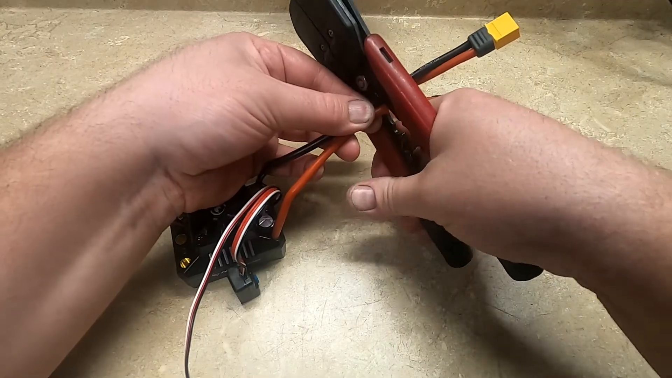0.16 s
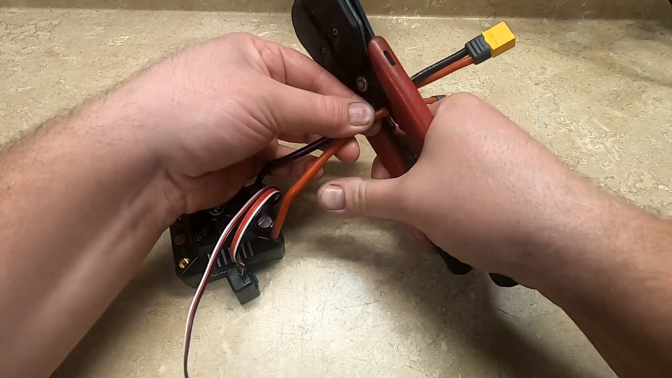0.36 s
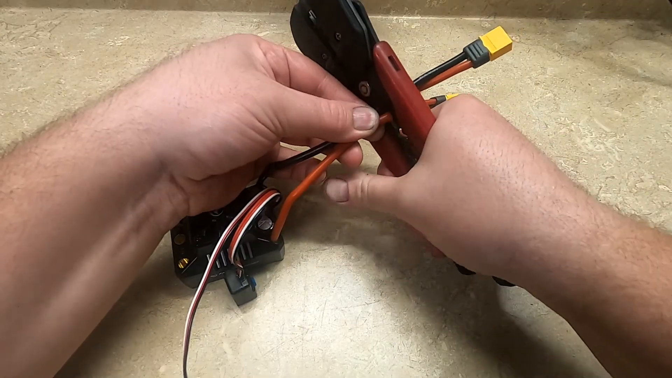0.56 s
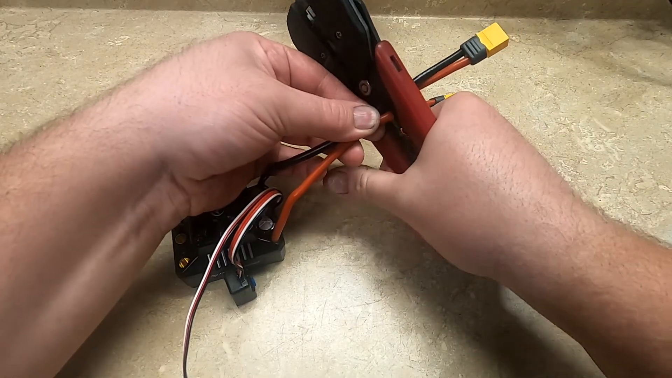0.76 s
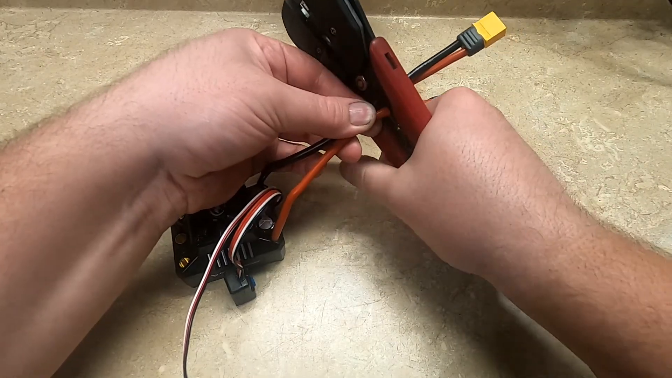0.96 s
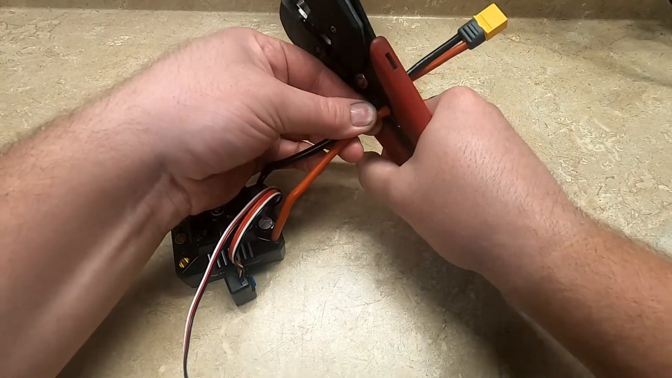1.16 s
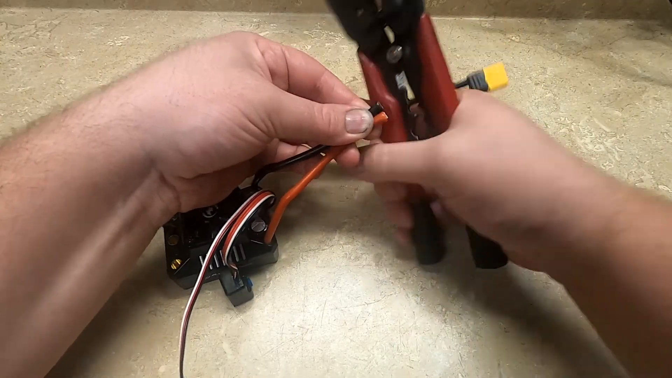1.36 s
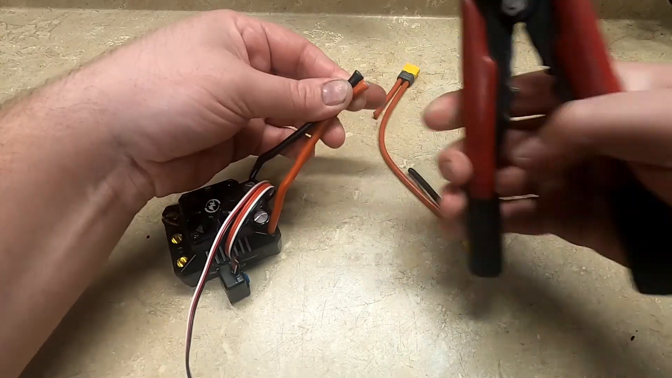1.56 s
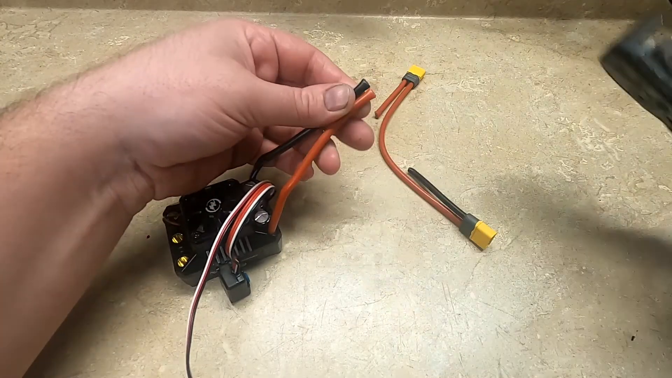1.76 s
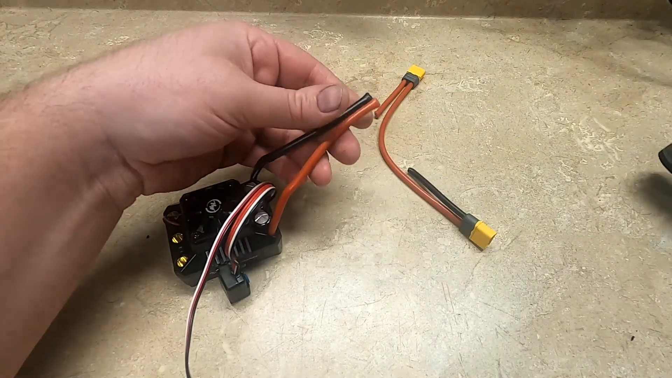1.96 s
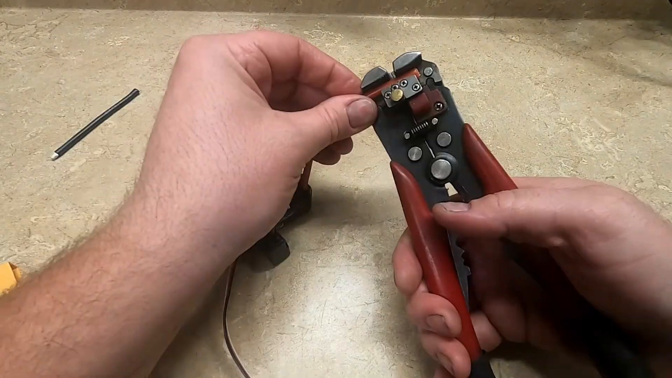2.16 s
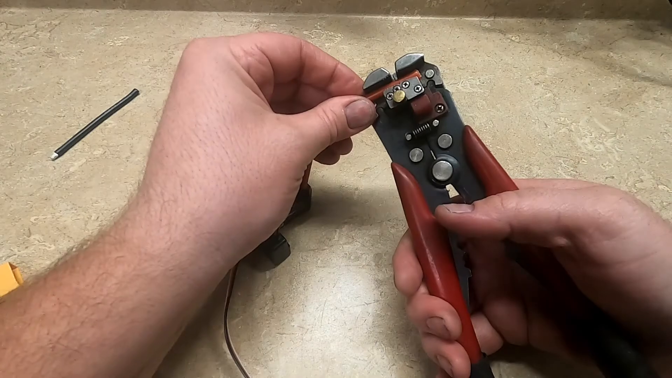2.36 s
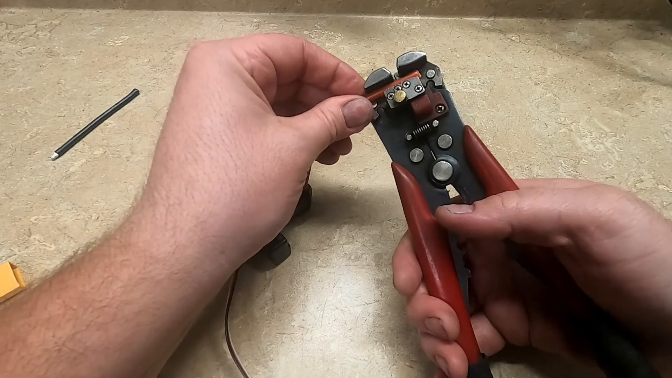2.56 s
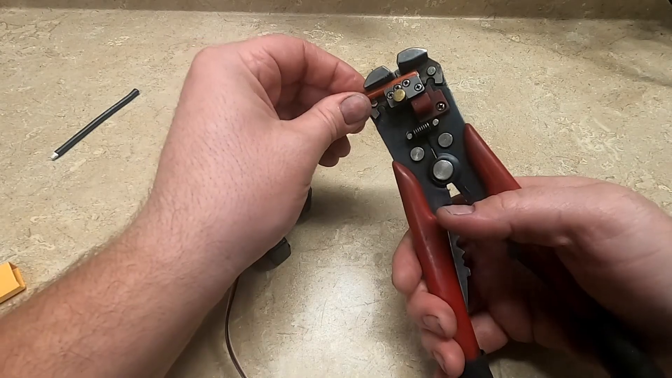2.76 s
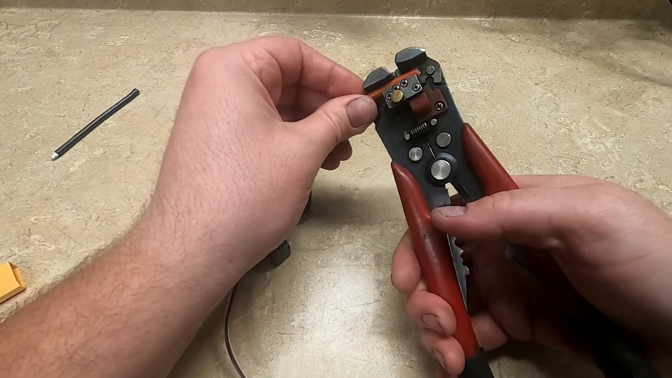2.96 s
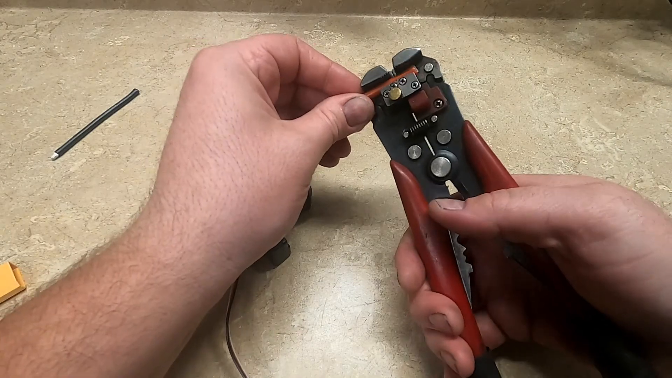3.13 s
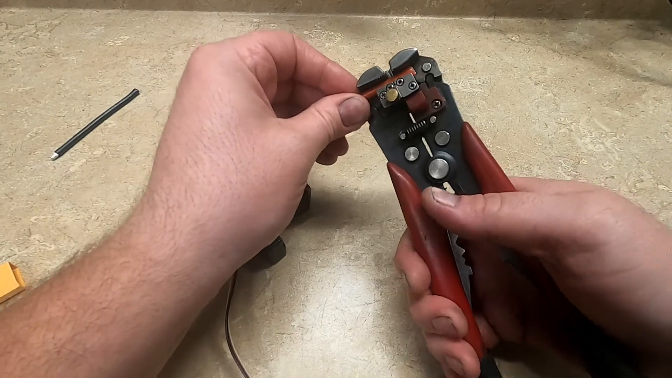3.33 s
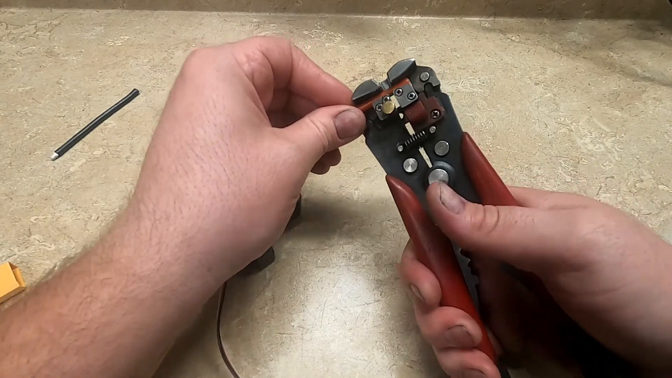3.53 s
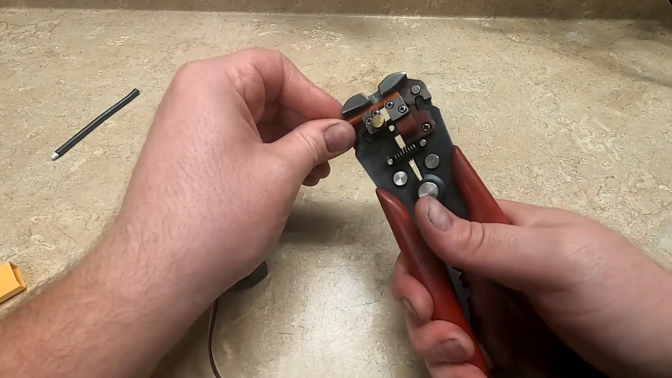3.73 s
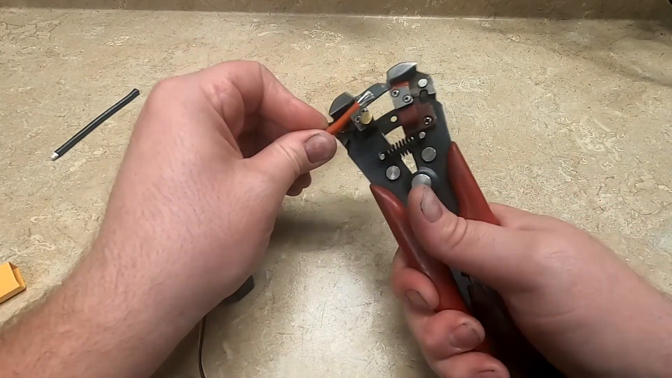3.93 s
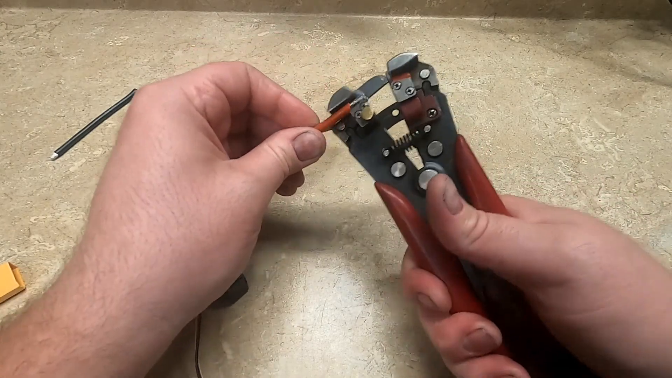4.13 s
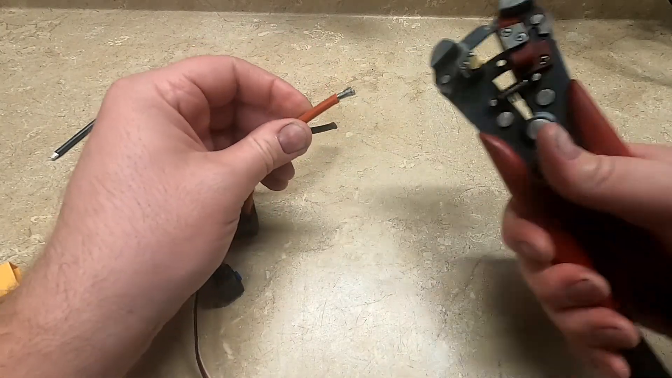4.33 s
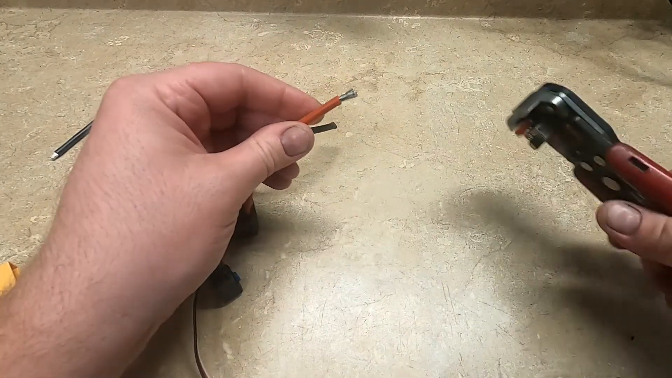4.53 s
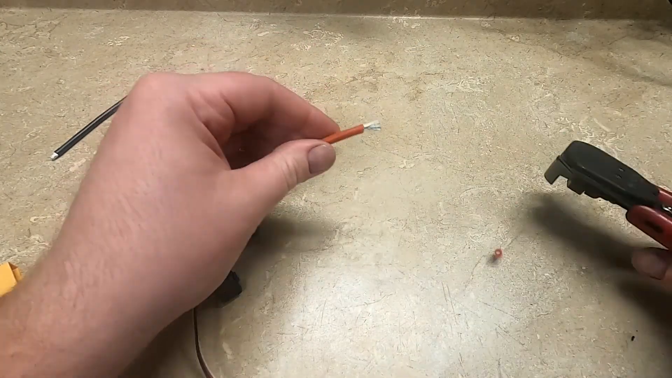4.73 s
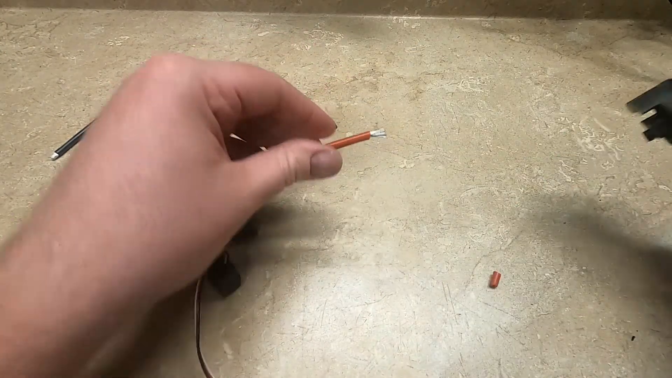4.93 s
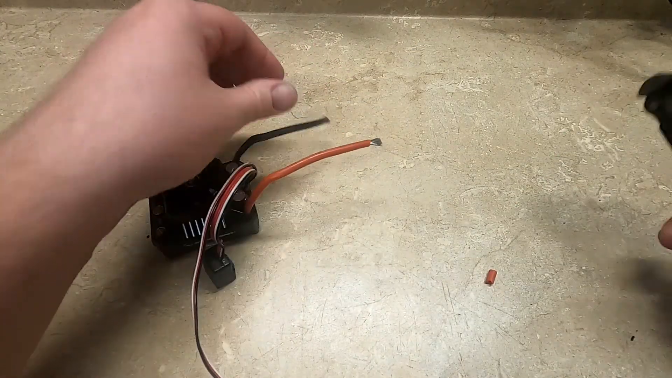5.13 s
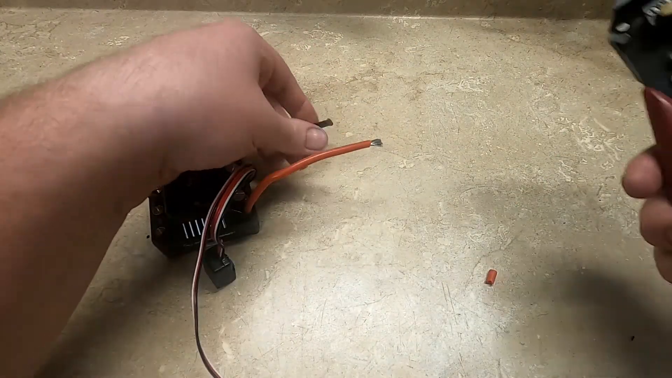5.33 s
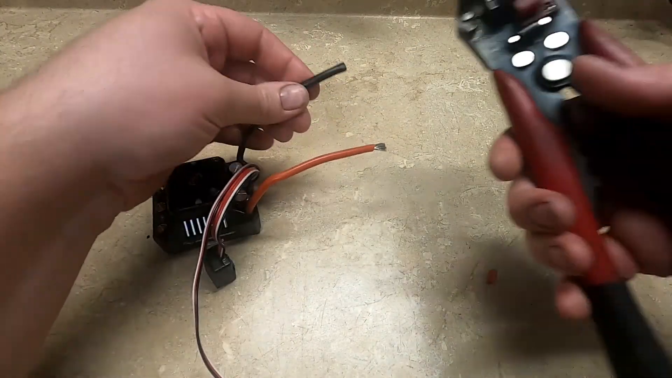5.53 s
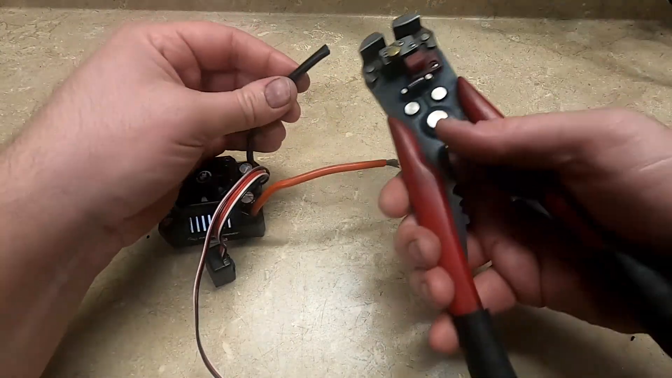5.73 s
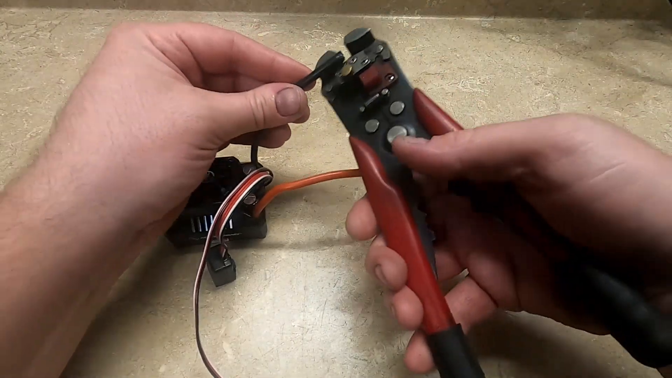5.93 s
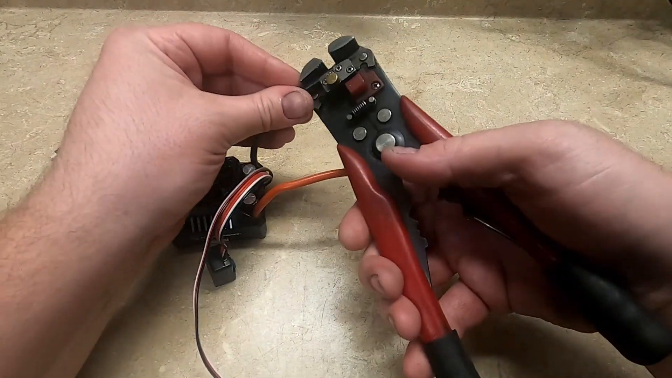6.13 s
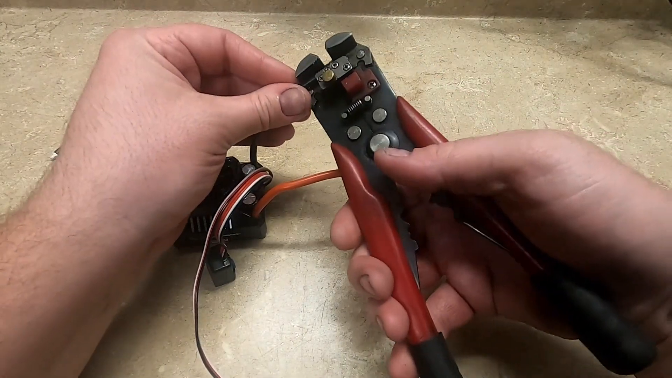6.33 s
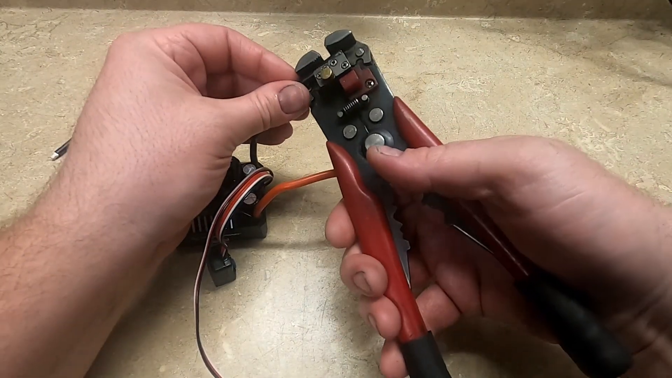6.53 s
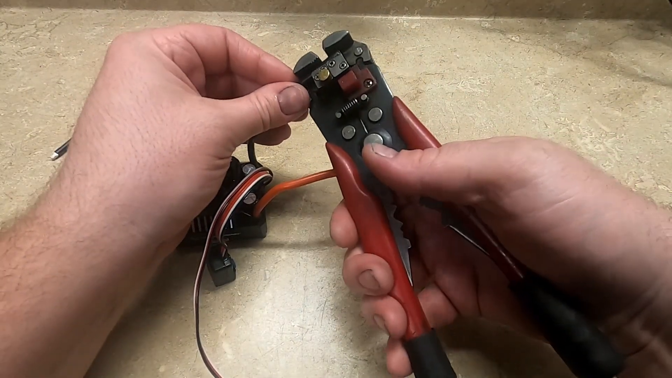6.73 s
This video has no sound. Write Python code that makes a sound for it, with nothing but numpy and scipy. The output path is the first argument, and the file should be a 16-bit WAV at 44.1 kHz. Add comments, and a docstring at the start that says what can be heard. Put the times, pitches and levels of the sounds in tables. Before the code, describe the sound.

Close metallic ticks give way to sharp tool snaps and counter thumps, then quiet fiddling, another snap burst, dull bouncing taps and faint rubs.

```python
"""A self-adjusting wire stripper is worked by hand over a hard countertop in a small room, close to the microphone.
First its steel jaws tick as they grip: cracks and rattles of noise that ring the steel. Then the insulation
gives in hard snaps that jolt the counter's low modes, and a cut-off plug lands to the right with hollow tones.
Tugs on the wires judder their plastic box along, as stick-slip noise through its resonances.
Later come more snaps, a stripped sleeve bouncing in dull taps, and last ticks, rubs and drags over a faint hush."""
import sys
import numpy as np
from scipy import signal
from scipy.fft import rfft, irfft, next_fast_len
from scipy.io import wavfile
from scipy.ndimage import uniform_filter1d

SR = 44100
rng = np.random.default_rng(int(sys.argv[2]) if len(sys.argv) > 2 else 0)


def file_out(sig):
    """Save sig as 16-bit WAV at sys.argv[1]."""
    # one column per channel
    cols = np.atleast_2d(sig).T
    # limit, then scale
    lim = np.clip(cols, -1, 1)
    pcm = np.round(lim * 32767).astype(np.int16)
    wavfile.write(sys.argv[1], SR, pcm)


N = 303849
TIME = np.arange(N) / SR
TICK_T60_S = 0.018  # rattle of a light tick

# colour of steel parts striking or brushing: (f/Hz, level/dB)
STEEL = [(150, -12.5), (500, -1.5), (1200, -0.5), (2200, 1.5), (4500, -3), (6600, -1), (7800, -6.5),
         (9500, -7), (11000, -14.5), (13000, -10.5), (16000, -24)]


def stripper():
    """Steel strikes steel and wire: loud snaps as the tool works, light ticks of jaws, pivots and wire ends."""
    # loud blows: (t/s, level/dB, centre f/Hz, rattle t60/s, fall to either side/(dB per octave))
    snap_blows = [(1.1846, -28.5, 4530, 0.01, 9.5), (1.1861, -18, 2270, 0.017, 5.5),
                  (1.1876, -9.5, 5900, .028, 25.5), (1.2312, -34, 770, 0.076, 16),
                  (1.4318, -24.5, 4340, 0.048, 7), (1.448, -24, 4300, 0.038, 6.5),
                  (1.4682, -26, 3910, 0.05, 4.5), (1.4904, -17, 5340, 0.032, -1),
                  (1.5852, -15, 7496, 0.013, 6), (1.590, -11.5, 3150, 0.015, 12),
                  (1.595, -17.5, 2500, 0.01, 8.5), (1.599, -11.5, 1130, 0.038, 12),
                  (4.009, -31, 2500, 0.067, 4.5), (4.0186, -14.5, 3600, .025, 6),
                  (4.0222, -14, 2600, 0.011, 9), (4.4535, -31, 2200, 0.013, 16),
                  (4.5638, -21.5, 3670, 0.018, 22.5), (4.568, -14.5, 4300, 0.035, 11),
                  (4.572, -14.5, 4300, 0.021, 17)]
    # light blows, before their trim: (t/s, level/dB, centre f/Hz, fall to either side/(dB per octave))
    tick_blows = [(0.2781, -31.5, 5360, 10.5), (0.3877, -43, 1700, 4), (0.399, -29.5, 4850, 5),
                  (0.8518, -33.5, 2130, 9), (1.0057, -45, 2529, 7), (1.3349, -40, 6254, 5),
                  (1.3944, -44.5, 3392, 9.5), (1.752, -41, 3980, 6), (2.0929, -53, 2130, 13),
                  (2.4243, -54, 2700, 5), (2.813, -55, 1820, 8), (2.909, -53.5, 1580, 3.5),
                  (3.0699, -47.5, 3100, 8.5), (3.1573, -50.5, 2610, 18), (4.132, -42, 2336, 35),
                  (4.3091, -46, 3840, 17), (4.3809, -43, 4896, 9.5), (4.699, -46.5, 3710, 9),
                  (5.146, -33, 2950, 39), (5.476, -45, 1780, 9.5), (6.0616, -58, 1483, 4),
                  (6.2556, -59, 1975, 5), (6.5801, -42.5, 1910, 20.5)]
    snaps, ticks = np.zeros((2, 2, N))
    for s, db, hz, t60, fall_db in snap_blows:
        add(snaps, s, amp(db) * impact(s, hz, t60, fall_db, ring_db=-18.5))
    for s, db, hz, fall_db in tick_blows:
        add(ticks, s, amp(db) * impact(s, hz, TICK_T60_S, fall_db, ring_db=-16.5))
    return snaps + amp(-1.5) * ticks


def impact(s, hz, t60, fall_db, ring_db, size=12000):
    """A crack and a fast rattle of loose steel parts set the jaws ringing; hz is the hardness of the contact."""
    # ringing of the steel jaws, detuned a little at each blow: (f/Hz, level/dB, t60/s)
    jaw_modes = [(2070, -3.5, 0.0232), (2320, -5, 0.029), (2580, -1.5, 0.024), (2700, -1, 0.074),
                 (3380, -2.5, 0.043), (3640, -3.5, 0.038), (3720, -5.5, 0.07), (4268, 1.5, 0.038),
                 (4676, -8, 0.14), (4700, -7.5, 0.041), (5966, -4, 0.075), (7080, 7.5, 0.051),
                 (9179, -6, 0.12)]
    # place of the tool: (t/s, lead of the microphone's right port over its left/microseconds)
    bearing = [(0, 43), (1.48, 29), (1.59, 12), (4.02, 18.6), (4.4, 2.7), (6.89, 3.5)]
    t = np.arange(size) / SR
    chatter = amp(3 * np.interp(t * 1500, np.arange(size), rng.standard_normal(size)))
    crack = 0.92 * np.exp(-t / .001)
    envelope = chatter * amp(-60 * t / max(t60, .004)) + crack
    rattle = ports(rng.standard_normal((2, size))) * envelope
    modes = sum(amp(db - 60 * t / life) * np.sin(2 * np.pi * f * rng.normal(1, 0.011) * t)
                for f, db, life in jaw_modes)
    ring = signal.fftconvolve(rattle, modes[None] / np.linalg.norm(modes), axes=1)[:, :size]
    sound = colour(rattle + amp(ring_db) * ring, lambda f: read(STEEL, f) + hump(f, hz, fall_db))
    # half the lead delays the left port, half advances the right
    lead_s = np.interp(s, *np.transpose(bearing)) / 1e6
    turn = np.exp(1j * np.pi * freqs(size) * lead_s * np.array([[-1], [1]]))
    heard = irfft(rfft(sound) * turn, size)
    return peaked(heard * (1 - t / t[-1]) ** 2)


def scuffs(size=9000, lead=.06):
    """Gritty scuffs of steel and cable: tiny catches crowd together as two surfaces brush past each other."""
    # (t of the peak/s, level/dB, centre f/Hz, rise/s, fade/s, fall to either side/(dB per octave))
    brushes = [(1.161, -46.5, 6000, 0.0019, 0.0035, -1), (1.176, -37, 4200, 0.0014, 0.0036, 13.5),
               (1.582, -26.5, 3866, 0.0026, 0.0024, 2), (3.461, -42.5, 1442, 0.0014, 0.023, 19.5),
               (4.017, -32, 3960, 0.0062, .003, 8), (4.379, -58, 5900, 0.007, 0.032, -3.5),
               (4.462, -39.5, 4660, 0.0053, 0.0087, 6.5), (4.569, -25.5, 6570, 0.0082, 0.011, 2.5),
               (5.062, -40, 1920, 0.0032, 0.012, 23), (5.149, -43, 4300, 0.011, 0.011, 10),
               (5.195, -45.5, 5560, 0.015, 0.025, 3), (5.284, -44, 3070, 0.0064, 0.016, 17)]
    t, out = np.arange(size) / SR - lead, np.zeros((2, N))
    for s, db, hz, rise, fade, fall_db in brushes:
        catches = amp(4.5 * np.interp((t + lead) * 1200, np.arange(size), rng.standard_normal(size)))
        swell = np.exp(-np.maximum(-t / rise, t / fade))
        grit = ports(rng.standard_normal((2, size))) * catches * swell
        scuff = colour(grit, lambda f: read(STEEL, f) + hump(f, hz, fall_db))
        add(out, s - lead, amp(db) * peaked(scuff))
    return out


def creep(count=6, spread_db=12.5, fall_db=15.5):
    """Under a steady squeeze the jaws give way in a few tiny, unevenly spaced slips."""
    # spells of faint ticking: (start t/s, length/s, greatest level/dB, centre f/Hz)
    spells = [(0.499, 0.3, -53, 2950), (2.949, 0.3, -56.5, 2800), (3.602, 0.38, -50.5, 3500),
              (6.729, 0.16, -48.5, 1710)]
    out = np.zeros((2, N))
    for start, length, db, hz in spells:
        for k, (late, weakness) in enumerate(rng.random((count, 2))):
            s = start + length * (k + late) / count
            slip = impact(s, hz, TICK_T60_S, fall_db, ring_db=-29)
            add(out, s, amp(db - spread_db * weakness) * slip)
    return out


def knocks(size=16000):
    """Hands, handles and box knock softly: the counter rings briefly in its low modes and shudders around them."""
    # dull blows, before their trim: (t/s, level/dB, centre f/Hz, t60 as damped by the hand/s)
    dull_blows = [(.485, -39.5, 242, 0.23), (.705, -36, 360, 0.16), (1.185, -10.5, 280, 0.022),
                  (1.207, -18.5, 50, 0.29), (1.222, -20, 46, 0.13), (1.333, -34, 233, 0.16),
                  (1.429, -19.5, 91, 0.12), (1.481, -15, 260, 0.065), (1.491, -18, 248, 0.27),
                  (1.595, -10, 296, 0.09), (1.603, -15.5, 112, 0.26), (2.154, -40, 260, 0.13),
                  (2.262, -39.5, 157.5, .12), (4.018, -17, 320, 0.036), (4.032, -12.5, 72, 0.14),
                  (4.06, -21.5, 99, 0.21), (4.617, -31.5, 121, 0.084), (4.641, -30.5, 104, 0.098),
                  (5.188, -35, 326, 0.1), (5.478, -41.5, 334, 0.18), (6.034, -33.5, 98, 0.23)]
    t, out = np.arange(size) / SR, np.zeros((2, N))
    for s, db, hz, t60 in dull_blows:
        decay = amp(-60 * t / max(t60, .01))
        shudder = colour(ports(rng.standard_normal((2, size))) * decay,
                         lambda f: bell(f, hz, 2.1, 55) - 6 * np.log2(1 + f / 2500))
        add(out, s, amp(db) * peaked(peaked(shudder) + 1.9 * counter(hz, t60)))
    return amp(-3.5) * out


def counter(hz, t60, size=16000):
    """The ring of the counter after a soft blow centred on hz; a resting hand cuts it short to t60."""
    # low modes of the counter: (f/Hz, level/dB, longest t60/s, left minus right/dB)
    counter_modes = [(42, 0.5, .3, 0.5), (67, -7, .15, 0.5), (102.5, 1, .28, -1), (174.8, 1.5, 0.14, -2.5),
                     (268, -4, 0.72, -0.5), (348.5, 0, 0.1, 0)]
    fall_db = 18  # per octave: a blow mostly wakes the modes near its centre
    t, ring = np.arange(size) / SR, 0
    for f, db, life, pan_db in counter_modes:
        side_db = pan_db * np.array([[.5], [-.5]])
        decay_db = -60 * t / max(min(life, t60), .01)
        ring = ring + amp(db + hump(f, hz, fall_db) + side_db + decay_db) * np.sin(2 * np.pi * f * t)
    return peaked(ring * (1 - np.exp(-t / 0.0026)))


def box_drag(slips_per_s=600, slip_db=-4):
    """The box sticks and slips, ringing its hollow shell and the counter; grit under it adds a brighter rasp."""
    # tugs: (start t/s, rise/s, hold/s, fade/s, then before trims: shell level/dB, grit level/dB, counter boom level/dB)
    tugs = [(-0.01, 0.004, 0.0061, 0.032, -36.5, -40, -62), (1.385, .07, 0.058, .05, -37.5, -35.5, -39.5),
            (1.56, 0.048, 0.0047, 0.048, -41, -23.5, -28), (3.475, 0.11, 0.12, 0.035, -36.5, -42, -42),
            (3.73, 0.022, 0.32, 0.039, -34, -38.5, -48), (4.16, 0.028, 0.0056, 0.028, -40, -51.5, -42.5),
            (5.59, 0.097, 0.044, 0.019, -31, -45.5, -30.5), (6.0, 0.066, .003, 0.014, -45, -77, -51)]
    # resonances of the box: (f/Hz, width/Hz, level/dB)
    box_modes = [(345.7, 95, -2), (712, 40, -13.5), (1002, 110, -13.5), (1450, 11, -11), (1718, 78, -25.5),
                 (2470, 34, -34), (3200, 55, -34.5)]
    # scrape beneath the resonances, before its trim: (f/Hz, level/dB)
    scrape_spectrum = [(40, -30.5), (100, -12.5), (170, -4), (320, -2), (480, -9), (600, -11),
                       (1500, -17.5), (2200, -25), (4000, -36.5), (7000, -44.5), (10000, -57), (15000, -56)]
    slips = (rng.random(N) < slips_per_s / SR) * rng.uniform(0.48, 1, N)
    hiss = noise([(20, 0), (16000, 0)])
    drive = amp(slip_db) * evened(slips - slips.mean()) + amp(-5.0) * hiss

    def shell_db(f):
        modes = sum(amp(db) ** 2 / (1 + (2 * (f - hz) / width) ** 2) ** 1.5 for hz, width, db in box_modes)
        return 10 * np.log10(modes + amp(read(scrape_spectrum, f) - 8) ** 2)

    scrape = colour(drive * flutter(1.6, 55), shell_db)
    # shell below 600 Hz, grit above
    body = signal.sosfiltfilt(signal.butter(3, 600, fs=SR, output="sos"), scrape)
    shell = amp(2.0) * evened(body) * level(tugs, axis=0)
    grit = amp(-5.0) * evened(scrape - body) * level(tugs, axis=1)
    ring = counter(hz=151, t60=0.17)
    boom = signal.fftconvolve(drive * level(tugs, axis=2), ring / np.linalg.norm(ring[0]), axes=1)[:, :N]
    return shell + grit + boom


def plug(start_s=1.231, level_db=-35, pan_db=-14.5, size=20000):
    """The cut-off plug lands to the right and rings with a few hollow tones; pan_db is left minus right."""
    # ringing of the plug: (f/Hz, level/dB, t60/s)
    plug_modes = [(178, 4.5, .3), (379, -7, .3), (437, -1, .42), (533, -0.5, 0.18), (694, -6, .1),
                  (877.7, -6.5, .18), (1030, -9.5, 0.23), (1220, -4.5, .1)]
    t, out = np.arange(size) / SR, np.zeros((2, N))
    ring = sum(amp(db - 60 * t / t60) * np.sin(2 * np.pi * hz * t) for hz, db, t60 in plug_modes)
    add(out, start_s, amp(level_db + pan_db * np.array([[.5], [-.5]])) * ring)
    return out


def offcut(t60=0.12, size=8000):
    """The rubbery sleeve of insulation bounces on the counter with hollow taps that have no treble."""
    # bounces, before their trim: (t/s, level/dB, centre f/Hz)
    bounces = [(4.614, -41, 2290), (4.739, -37, 1690), (4.851, -49.5, 1280), (4.947, -46, 960)]
    t, out = np.arange(size) / SR, np.zeros((2, N))
    for s, db, hz in bounces:
        tap = ports(rng.standard_normal((2, size))) * amp(-60 * t / t60)
        dull = colour(tap, lambda f: hump(f, hz, 4.0) - 10 * np.log10(1 + (f / 2300) ** 10))
        add(out, s, amp(db) * peaked(dull))
    return amp(-6.5) * out


def palms(size=44100):
    """Each shift of a palm on the rubber grips is a soft, juddering rub with its own pitch."""
    # (start t/s, rise/s, hold/s, fade/s, level before trim/dB, centre f/Hz, fall to either side/(dB per octave))
    shifts = [(0.0, 0.0068, 0.046, 0.067, -41.5, 148, 3), (0.311, 0.08, 0.043, 0.029, -46.5, 168, 7),
              (0.45, 0.059, 0.14, 0.18, -53, 480, 4), (1.157, 0.014, 0.3, 0.1, -40.5, 198, 2),
              (1.601, 0.042, 0.064, 0.11, -41, 188, 4), (2.12, 0.031, 0.032, 0.065, -48, 120, 5),
              (3.278, .025, .01, 0.032, -51.5, 330, 3.5), (4.601, 0.013, .05, 0.24, -51, 230, 5),
              (5.121, 0.044, .02, 0.074, -43.5, 140, 9), (5.72, .03, 0.024, 0.067, -47, 130, 10.5),
              (6.03, .03, .03, 0.16, -54, 110, 4), (6.55, 0.29, .1, 0.059, -52, 288, 36)]
    # colour of the rubbing: (f/Hz, level/dB)
    rub_spectrum = [(60, -25), (130, -6), (180, 3.5), (250, -4), (330, 4), (480, -7.5), (700, -18.5),
                    (1500, -34.5), (5000, -65.5)]
    t, out = np.arange(size) / SR, np.zeros((2, N))
    for start, rise, hold, fade, db, hz, fall_db in shifts:
        rub = colour(ports(rng.standard_normal((2, size))), lambda f: read(rub_spectrum, f) + hump(f, hz, fall_db))
        add(out, start, amp(db) * evened(rub) * stroke(t, 0, rise, hold, fade))
    return amp(-3) * out * flutter(2.9, 35)


def wire_slides():
    """Wire sliding through the fingers and jaws is noise, roughened by uneven contact."""
    # (start t/s, rise/s, hold/s, fade/s, level before trim/dB)
    pulls = [(0.42, 0.089, 0.17, 0.022, -62.5), (1.48, 0.05, 0.078, .07, -37),
             (3.39, 0.023, 0.028, 0.016, -61.5), (3.452, 0.014, 0.0033, 0.012, -41.5),
             (5.0, 0.034, 0.093, 0.034, -47), (5.057, 0.0016, 0.0063, 0.0081, -37.5),
             (6.7, 0.17, .03, .05, -62.5)]
    # colour of the sliding wire: (f/Hz, level/dB)
    wire_spectrum = [(250, 3), (700, 10.5), (1000, 7.5), (1500, 8), (2500, -8), (4000, -18.5), (8000, -28),
                     (15000, -56)]
    return amp(-2) * noise(wire_spectrum) * flutter(0.98, 210) * level(pulls)


def skin_hiss():
    """Skin hisses along the grips as they are squeezed: noise with a fast and a slow unevenness."""
    # (start t/s, rise/s, hold/s, fade/s, level before trim/dB)
    squeezes = [(-0.05, 0.042, .45, 0.59, -77), (0.06, 0.034, 0.052, 0.03, -69.5),
                (1.05, 0.084, 0.0078, 0.029, -71.5), (1.18, .02, 0.31, .17, -62.5),
                (4.25, 0.16, 0.11, .03, -68.5), (5.2, 0.091, 0.23, 0.15, -81)]
    # colour of the skin: (f/Hz, level/dB)
    skin_spectrum = [(700, -26.5), (2000, -3.5), (3500, -2.5), (5000, -6), (6600, 3), (8200, -14),
                     (11000, -20.5), (15000, -28)]
    return amp(5.5) * noise(skin_spectrum) * flutter(1.1, 170) * flutter(1.2, 28) * level(squeezes)


def arm_rumble():
    """Arms pressing on the counter give swells of low rumbling noise."""
    # (start t/s, rise/s, hold/s, fade/s, level before trim/dB)
    leans = [(0.04, 0.046, 0.022, 0.043, -42), (0.22, 0.077, 0.11, 0.073, -42),
             (0.96, 0.05, 0.0095, 0.025, -48.5), (1.15, 0.079, 0.04, .08, -32.5),
             (1.42, .07, 0.11, 0.054, -32.5), (3.98, 0.038, 0.048, 0.046, -31.5),
             (4.3, 0.094, 0.22, 0.096, -54.5), (5.08, 0.057, 0.033, .1, -47)]
    # colour of the rumble: (f/Hz, level/dB)
    rumble_spectrum = [(15, -12.5), (38, 4.5), (60, -6.5), (100, 1.5), (150, -17.5), (400, -59.5)]
    return amp(-4.0) * noise(rumble_spectrum) * level(leans)


def house_hush():
    """The faint hush of the house is steady noise."""
    # colour of the hush: (f/Hz, level/dB)
    hush_spectrum = [(15, -33.5), (25, 4), (49, 2), (96, -9), (178, 0), (322, -8.5), (457, -20.5),
                     (919, -29.5), (1110, -22.5), (1950, -22.5), (5010, -36.5), (6380, -34), (8350, -43.5),
                     (15500, -61.5)]
    return amp(-61.5) * noise(hush_spectrum)


def room(x, tail_db=-13, early_db=-14, size=30000, count=3):
    """Quick reflections from counter and back wall, then a tail that dies band by band."""
    # decay of the small room: (f/Hz, t60/s)
    decay_times = [(100, 0.78), (400, 0.13), (1200, 0.41), (3000, 0.31), (6500, 0.25), (9000, 0.27),
                   (14000, 0.37)]
    t = np.arange(size) / SR
    sparse = rng.standard_normal((2, size)) * (rng.random(size) < .05)
    early = ports(sparse) * np.exp(-t / 0.0066) * (t > .002)
    wet = amp(early_db) * signal.fftconvolve(x, early / np.linalg.norm(early[0]), axes=1)[:, :N]
    for k in range(count):
        hz, age, z = signal.stft(ports(rng.standard_normal((2, size))), SR, nperseg=256)
        decay = amp(-60 * age / read(decay_times, hz)[:, None])
        tail = signal.istft(z * decay, SR, nperseg=256)[1][:, :size] * (1 - np.exp(-t / 0.00033))
        # unrelated tails take turns at a steady fast rate, so the reverberation sounds smooth and even
        share = np.sqrt(2 / count) * np.cos(np.pi * (70 * TIME + k / count))
        wet += amp(tail_db) * signal.fftconvolve(x * share, tail / np.linalg.norm(tail[0]), axes=1)[:, :N]
    return x + wet


def stroke(t, start, rise, hold, fade):
    """One movement of the hand: it speeds up evenly, holds, and dies away; rise and fade last 2 ms at least."""
    speed_up = np.clip((t - start) / max(rise, .002), 0, 1)
    return speed_up * np.exp(-np.maximum(t - start - rise - hold, 0) / max(fade, .002))


def level(strokes, axis=0):
    """Gain curve of a table of strokes, from one of its dB columns; overlapping strokes add in power."""
    return np.sqrt(sum((amp(dbs[axis]) * stroke(TIME, start, rise, hold, fade)) ** 2
                       for start, rise, hold, fade, *dbs in strokes))


def flutter(depth_db, rate_hz):
    """Random unevenness of a sliding contact."""
    return amp(depth_db * np.interp(TIME * rate_hz, np.arange(N), rng.standard_normal(N)))


def noise(spectrum):
    """Stereo noise of rms 1 with the given spectrum."""
    pair = ports(rng.standard_normal((2, next_fast_len(N, True))))[:, :N]
    return evened(colour(pair, lambda f: read(spectrum, f)))


def ports(pair):
    """Blends two unrelated signals into a left and right whose likeness depends on frequency."""
    # diffuse sound at the microphone: (f/Hz, left-right likeness)
    likeness = [(60, 0.99), (300, .92), (700, 0.89), (3000, 0.98), (7000, .8), (14000, 0.94)]
    size = pair.shape[1]
    same = np.clip(read(likeness, freqs(size)), 0, 1)
    mid, side = rfft(pair) * np.sqrt([(1 + same) / 2, (1 - same) / 2])
    return irfft([mid + side, mid - side], size)


def colour(x, db_of, size=4096):
    """Causal minimum-phase filter with the gain db_of(Hz), no lower than -100 dB."""
    log_gain = np.log(amp(np.maximum(db_of(freqs(size)), -100)))
    circle = np.r_[log_gain, log_gain[-2:0:-1]]
    taps = np.fft.ifft(np.exp(np.conj(signal.hilbert(circle)))).real[:size // 2]
    return signal.oaconvolve(x, taps[None], axes=1)[:, :x.shape[1]]


def hump(f, hz, fall_db):
    """A rounded peak in dB at hz that falls by fall_db an octave on both sides."""
    return -fall_db * (np.hypot(np.log2((f + 1) / hz), 1 / 10) - 1 / 10)


def bell(f, hz, octaves, depth_db):
    """A hump in dB around hz that levels out depth_db lower."""
    return depth_db * (np.exp(-(np.log2((f + 1) / hz) / octaves) ** 2 / 2) - 1)


def read(points, hz):
    """Reads a curve on a log-frequency axis."""
    f, value = np.transpose(points)
    return np.interp(np.log(hz + 1), np.log(f + 1), value)


def peaked(x, size=88):
    """Scales the loudest two milliseconds to rms 1."""
    return x / np.sqrt(uniform_filter1d((x ** 2).mean(0), size).max())


def evened(x):
    """Scales to rms 1."""
    return x / np.sqrt(np.mean(x ** 2) + 1e-20)


def amp(db):
    """Turns dB into a gain."""
    return 10 ** (np.asarray(db) / 20)


def freqs(size):
    """Frequencies in Hz of a real spectrum."""
    return np.fft.rfftfreq(size, 1 / SR)


def add(mix, s, sound):
    """Adds a sound to the mix in place from s seconds on, cut off at the end."""
    part = mix[:, max(round(s * SR), 0):][:, :sound.shape[1]]
    part += sound[:, :part.shape[1]]


def scene():
    """Tool, sleeve, plug and box sound into the room, over the hands and the faint hush of the house."""
    sources = stripper() + scuffs() + creep() + knocks() + box_drag() + plug() + offcut()
    hands = palms() + wire_slides() + skin_hiss() + arm_rumble()
    return room(sources) + hands + house_hush()


def record(dry):
    """The level dips briefly once; then the treble is cut off above the band limit."""
    edge_hz = 15800
    dip = amp(np.interp(TIME, [2.1, 2.108, 2.126, 2.134], [-2, -4.0, -32.0, -2.5]))  # t/s, gain/dB
    low_pass = signal.firwin(255, edge_hz, window=("kaiser", 9), fs=SR)
    return signal.oaconvolve(dry * dip, low_pass[None], "same")


dry = scene()
out = record(dry)
file_out(out)
```